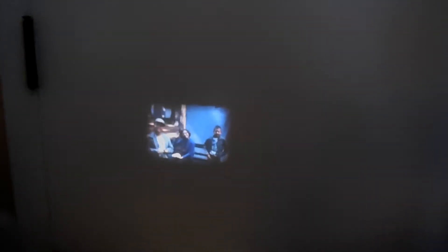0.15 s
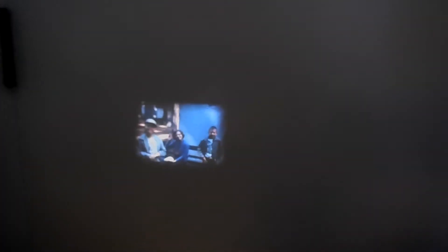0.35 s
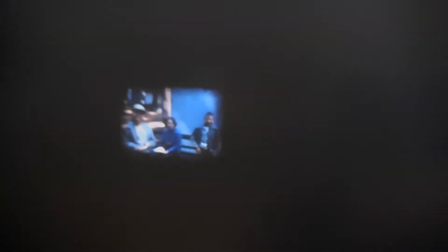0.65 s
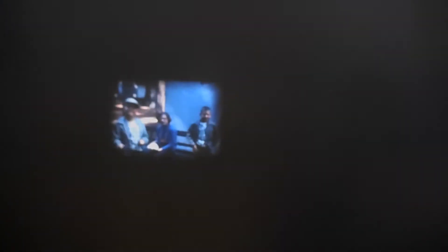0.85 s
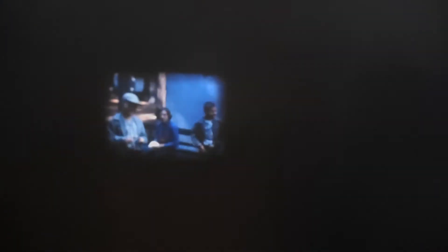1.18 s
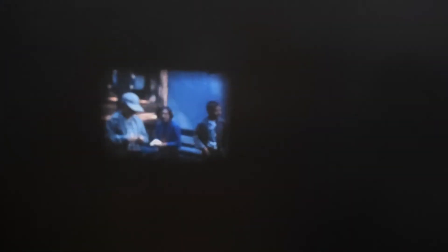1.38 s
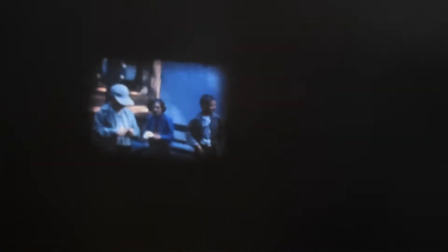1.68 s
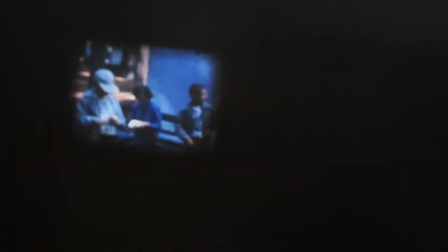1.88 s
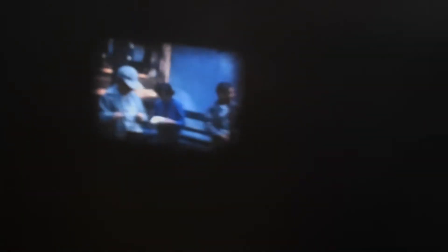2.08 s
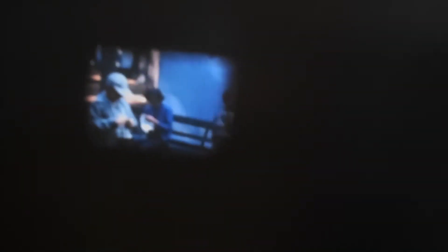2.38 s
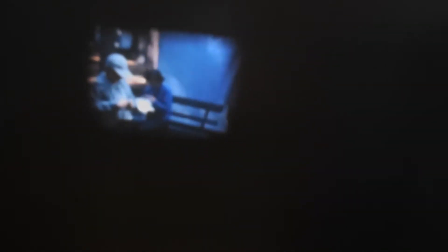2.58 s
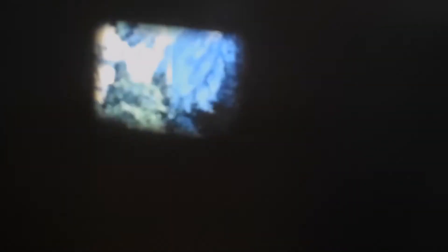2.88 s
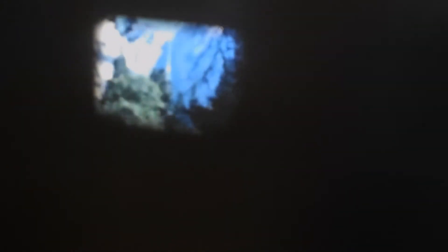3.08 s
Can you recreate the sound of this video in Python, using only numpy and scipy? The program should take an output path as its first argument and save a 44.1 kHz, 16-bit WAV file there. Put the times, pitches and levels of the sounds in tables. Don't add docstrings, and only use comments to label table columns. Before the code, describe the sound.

A small film projector chatters steadily in a room, about thirteen strokes a second, over fan wash and gear whine. Muffled at first, it abruptly becomes crisp and full past two seconds, recorded by a handheld camera.

```python
import sys
import numpy as np
from scipy import signal
from scipy.fft import irfft
from scipy.io import wavfile
from scipy.ndimage import uniform_filter1d

SR = 44100
rng = np.random.default_rng(int(sys.argv[2]) if len(sys.argv) > 2 else 0)


def store_pcm(level_fs):
    pcm = np.round(np.clip(level_fs, -1, 1) * 32767).astype(np.int16)
    wavfile.write(sys.argv[1], SR, np.atleast_2d(pcm).T)


def ratio_of_db(decibels):
    return 10 ** (np.asarray(decibels, float) / 20)


N = 142884

# start_s, housing_blow_db, gate_rattle_db, upper_gear_mesh_db
STROKES = [(0.0, 7.5, 0, 9), (0.0722, -1.5, -0.5, -15), (0.1461, -2.5, 0, 10), (0.2216, -1.5, -1.5, 0),
           (0.2957, -2.5, 0.5, 3), (0.3698, -2.5, -1.5, 0), (0.4443, -1, 0.0, 0), (0.5182, -0.5, 0.5, 1),
           (0.5939, 0.5, -0.5, 2), (0.6678, -1, 1.5, 1.5), (0.7422, -1.5, -0.5, 4), (0.8176, -1, -0.5, 2),
           (0.8913, -1, 1.5, 0.5), (0.9663, -0.5, -1, -1), (1.0406, -0.5, 0, 2), (1.1153, -2.5, -0.5, 7),
           (1.1905, -0.5, 0.5, 1), (1.2645, -0.5, 1, 2), (1.3396, 1, -1, 3.5), (1.4137, 0.5, 1, 5),
           (1.487, -1.5, 0.5, 1), (1.5616, -1, 0.0, -3), (1.6349, 0, -0.5, 0.5), (1.7095, -0.5, -0.0, 3.5),
           (1.7835, -2.5, 0.5, -2), (1.8573, 1.0, 3.5, 2), (1.9329, 1, 1.5, 3), (2.0064, 1.5, 1.5, 2),
           (2.0809, 5, 2.5, 2), (2.1551, 2.5, 1.5, 5), (2.2283, -1, -2.5, 4), (2.3022, -0.5, -1.5, -5),
           (2.3751, -0.5, 1, 6.5), (2.4495, -2.5, -1.5, 2.5), (2.5237, -2.5, -1, 4.5),
           (2.5967, -2, -0.5, 2), (2.6716, -1.5, -1, 6.5), (2.7453, 0.5, 0, -1), (2.8197, 1.0, -0.5, 3),
           (2.8943, -3.5, -2, -1.5), (2.9679, -2, -2, 2.5), (3.0433, 0, -1.5, -0.5), (3.1173, -2, -2, -2.0),
           (3.1914, -3, -1.0, 4.5)]


def read(points, hz):
    f, value = np.transpose(points)
    return np.interp(np.log(hz + 1), np.log(f + 1), value)


def evened(x):
    return x / np.sqrt(np.mean(x ** 2) + 1e-20)


def colour(x, points):
    hz = np.fft.rfftfreq(4096, 1 / SR)
    taps = np.roll(irfft(ratio_of_db(read(points, hz))), 2048) * np.hanning(4096)
    return signal.oaconvolve(x, taps, "same")


def shifted(x, delay_s):
    return np.roll(x, round(delay_s * SR))


def drift(change_s):
    size = round(change_s * SR)
    once = uniform_filter1d(rng.standard_normal(N), size)
    return evened(uniform_filter1d(once, size))


def resonate(x, hz, width_hz):
    turn = np.exp(2j * np.pi * np.cumsum(hz * np.ones(len(x))) / SR)
    radius = np.exp(-np.pi * width_hz / SR)
    return 2 * (turn * signal.lfilter([1 - radius], [1, -radius], x / turn)).real


def strokes(column):
    table, train = np.array(STROKES), np.zeros(N)
    train[(table[:, 0] * SR).astype(int)] = ratio_of_db(table[:, column])
    return train


def burst(train, t60):
    rise_s, hold_s, lead_s, lead_db = .004, .013, .005, -9
    t = np.arange(9000) / SR - lead_s
    decay = ratio_of_db(-60 * np.maximum(t - hold_s, 0) / t60) ** 2
    power = np.where(t < 0, ratio_of_db(lead_db) ** 2, np.minimum(1.0 + t / rise_s, 1) * decay)
    lead = round(lead_s * SR)
    level = np.sqrt(abs(signal.oaconvolve(train ** 2, power)[lead:N + lead]))
    return level, np.sqrt(power), lead


def ticks(size):
    ticks_per_s, spread_db = 7000, 1.6
    hit = rng.random(size) < ticks_per_s / SR
    strength_db = spread_db * np.minimum(rng.exponential(1, size), 4)
    return evened(hit * rng.standard_normal(size) * ratio_of_db(strength_db))


def rumble():
    # centre_hz, width_hz, level_db
    lumps = [(39.8, 16, 3.5), (60, 13, 5), (92, 7.8, 5.5)]
    # time_s, level_db
    swell = [(0, -54), (.4, -45.5), (0.799, -39.5), (1.199, -40), (1.6, -42.5), (2.0, -35), (2.299, -49.5),
             (2.499, -46), (2.6, -44.5), (2.75, -48), (2.9, -68), (3.048, -44.5), (3.24, -44)]
    low = np.zeros(N)
    for hz, width_hz, db in lumps:
        once = resonate(rng.standard_normal(N), hz, width_hz)
        low += ratio_of_db(db) * evened(resonate(once, hz, width_hz))
    return evened(low) * ratio_of_db(np.interp(np.arange(N) / SR, *np.transpose(swell)))


def grip():
    # time_s, pitch_hz, level_db
    creak = [
        (2.199, 99, -65),
        (2.329, 102.2, -44),
        (2.42, 96.8, -54),
        (2.5, 92, -42),
        (2.58, 73.2, -52),
        (2.66, 62.6, -41),
        (2.838, 60, -37.5),
        (2.921, 60, -44),
        (3.24, 74.3, -44),
    ]
    s, hz, db = np.transpose(creak)
    t = np.arange(N) / SR
    turns = np.cumsum(np.interp(t, s, hz) + 3.2 * drift(0.018)) / SR
    return ratio_of_db(np.interp(t, s, db) + 1.3 * drift(0.014)) * np.sin(2 * np.pi * turns)


def wash():
    # frequency_hz, level_db
    fan_colour = [(110, -52), (165, -35), (260, -14.5), (425, -1.5), (890, -10), (1480, -13.5),
                  (7700, -18.5), (10800, -14), (12300, -7), (15800, -10.5)]
    wash_db, patch_db = -29.5, 1.5
    wobble_db, wobble_hz, wobble_phase = 0.8, 5.3, .3
    frames, hz = N // 256 + 5, np.fft.rfftfreq(1024, 1 / SR)
    a, b, c, d, patches = rng.standard_normal((frames, 513, 5)).T
    patches = uniform_filter1d(patches, size=10, axis=0)
    patches = evened(uniform_filter1d(patches, size=10, axis=1))
    t = (np.arange(frames) - 2) * 256 / SR
    wobble = wobble_db * np.cos(2 * np.pi * wobble_hz * t - wobble_phase)
    gain = ratio_of_db(read(fan_colour, hz)[:, None] + patch_db * patches + wobble)
    bins = np.array([a + 1j * b, c + 1j * d]) * gain
    noise = signal.istft(bins, nperseg=1024, noverlap=768)[1][:, :N]
    return ratio_of_db(wash_db) * evened(noise)


def whine(train):
    # pitch_hz, wander_hz, level_db, load_db, load_start_s, load_length_s
    gear_tones = [(1134, 12, -37.5, 2.5, -.004, .012), (1213, 10, -44, 6.5, -.004, .04)]
    # early_mesh_db, late_mesh_db
    lower_mesh = [(1, -4.5), (-6, 0), (-2, 4), (-7, -19), (-1.5, 5), (-10, -8), (5, -11), (2, 3.5),
                  (-1, -2), (1, -4), (-7, 5), (-14, -2), (3.0, 8.5), (-7, -4), (0, -4), (0, 2), (-5, -8),
                  (1, -8), (2.5, -14), (6, -1), (4, 0), (6, -6), (1, 1.5), (2.5, 4.5), (-20, -4),
                  (1.0, 2.5), (1, 1), (-9, 6.5), (-4, -20), (6, 1), (-2, 1.0), (6.5, -2), (1.0, -1.5),
                  (-2, 8.5), (-6, 6.5), (2, 0), (2.0, -6), (-0.0, 2.0), (2.5, 6.5), (-3, 2), (-4, 0),
                  (-1, 1.5), (-1, 3.5), (2.5, -4)]
    sag_hz, sag_at_s, flutter_db, wander_s = 11, -.012, 1.8, .014
    t, out, at = np.arange(N) / SR, np.zeros(N), np.array(STROKES)[:, 0]
    sag = sag_hz * (1 - 2 * signal.oaconvolve(shifted(train, sag_at_s), np.hanning(3274), "same"))
    halves = (at[:, None] + [.009, .045]).ravel()
    lower_db = np.interp(t, halves, np.ravel(lower_mesh))
    upper_db = np.interp(t, at + .017, np.array(STROKES)[:, 3])
    for (hz, wander_hz, db, load_db, start_s, length_s), mesh_db in zip(gear_tones, (lower_db, upper_db)):
        load = signal.oaconvolve(shifted(train, start_s), np.ones(round(length_s * SR)))[:N]
        load = uniform_filter1d(load, size=250)
        level_db = db + load_db * load + flutter_db * drift(wander_s) + mesh_db
        pitch_hz = hz + sag + wander_hz * drift(wander_s)
        out += ratio_of_db(level_db) * np.sin(2 * np.pi * np.cumsum(pitch_hz) / SR)
    return out


def flap(train):
    late_s, t60, flap_hz, flap_db = 0.0021, 0.27, 7800, -45.5
    level = burst(shifted(train, late_s), t60)[0]
    highpass = signal.butter(4, flap_hz, "high", fs=SR, output="sos")
    return ratio_of_db(flap_db) * evened(signal.sosfilt(highpass, level * ticks(size=N)))


def cam(train):
    # delay_s, level_db
    cycle = [
        (.0018, -4.5),
        (.0075, 1.5),
        (.0145, -12.5),
        (0.0216, -14),
        (.028, -6.5),
        (0.031, -17),
        (0.047, -4.5),
        (0.06, -4),
        (0.07, -10),
    ]
    tick_db, tick_hz, t60, spread_db = -28, 4300, .009, 2.5
    t = np.arange(800) / SR
    tick = ratio_of_db(-60 * t / t60) * np.sin(2 * np.pi * tick_hz * t) + .3 * (t == 0)
    hits = np.zeros(N)
    for delay_s, db in cycle:
        strength = ratio_of_db(db + spread_db * rng.standard_normal(N))
        hits += strength * shifted(train, delay_s) * rng.choice([-1., 1.], N)
    return ratio_of_db(tick_db) * signal.oaconvolve(hits, tick)[:N]


def rattle(train):
    # frequency_hz, level_db
    gate_colour = [(900, -10.5), (1500, -7.5), (2100, -1.5), (3050, -10), (4250, -5.5), (6800, -13.5),
                   (13300, -1.5), (15800, -7.5)]
    same_db, same_hz, fresh_db, t60 = -47.5, 3760, -31, 0.12
    level, shape, lead = burst(train, t60)
    same = signal.oaconvolve(train, ticks(size=len(shape)) * shape)[lead:N + lead]
    same = signal.lfilter(*signal.butter(2, same_hz, fs=SR), colour(same, gate_colour))
    fresh = colour(level * ticks(size=N), gate_colour)
    return ratio_of_db(same_db) * evened(same) + ratio_of_db(fresh_db) * evened(fresh)


def housing(train):
    mode_hz = [338, 385, 422, 468, 498, 555, 628, 704, 766, 960, 1020, 1670, 1860, 2090]
    # level_db, t60_s
    mode_ring = [(-51.5, .25), (-47, .1), (-39, .22), (-41, .17), (-40, .05), (-42, .12), (-38.5, .06),
                 (-38, .11), (-40.5, .09), (-48.5, .05), (-46, .09), (-39.5, .1), (-44, .05), (-36, .06)]
    rebound_share = [.5, .2, -.1, .7, -.4, -.5, -.7, -.45, -.4, 0, 0, .1, .1, .3]
    early_s, rebound_s, push_s, uneven, housing_db = .0015, .0135, .0045, .2, 8
    t, out = np.arange(14000) / SR, np.zeros(N)
    blow = shifted(train, -early_s)
    back = shifted(train, rebound_s - early_s)
    for k, (hz, share, (db, t60)) in enumerate(zip(mode_hz, rebound_share, mode_ring)):
        decay = ratio_of_db(db + housing_db - 60 * t / t60)
        push = 1 - np.exp(-t / push_s)
        ring = (-1) ** k * decay * np.sin(2 * np.pi * hz * t) * push
        blows = (blow + share * back) * (1 + uneven * rng.standard_normal(N))
        out += signal.oaconvolve(blows, ring)[:N]
    return out


def room(x):
    # frequency_hz, t60_s
    decay_time = [(200, 0.53), (1000, 0.061), (4000, 0.095), (12000, 0.12)]
    taps = np.zeros((2, 20000))
    at = np.arange(100, 19980, 20) + rng.integers(0, 20, (2, 994))
    np.put_along_axis(taps, at, rng.choice([-1., 1.], at.shape), 1)
    hz, t, bins = signal.stft(taps, SR, nperseg=256)
    decay = ratio_of_db(-60 * t / read(decay_time, hz)[:, None])
    tail = signal.istft(bins * decay, SR, nperseg=256)[1]
    return signal.fftconvolve(x[None], tail / np.linalg.norm(tail[0]), axes=1)[:, :N]


def scene():
    # frequency_hz, level_db
    side_colour = [(60, -37), (160, -29), (330, -33), (640, -5), (1410, -7), (3100, 2.5), (6820, 0),
                   (15000, -2.5)]
    # frequency_hz, level_db
    lean = [(60, 0), (240, -.2), (600, -.8), (2000, -1.3), (4000, 1), (8000, -.1), (13000, 1.3)]
    gate_late_s, housing_wet, room_db = .002, .25, -6.5
    train, gate_train = strokes(column=1), strokes(column=2)
    loose = shifted(gate_train, gate_late_s)
    body = housing(train)
    gate = rattle(loose) + flap(loose) + cam(gate_train)
    machine = body + gate
    wet = room(housing_wet * body + gate)
    air = wash()
    gears = whine(1. * (train > 0))
    mid = machine + ratio_of_db(room_db) * wet[0] + air[0] + gears + rumble() + grip()
    side = 0.29 * np.roll(machine, 7) + 1.0 * wet[1] + air[1]
    side += 0.13 * np.roll(air[0], 7) + 0.59 * np.roll(gears, 9)
    side = colour(side, side_colour)
    left = colour(mid + side, [(f, db / 2) for f, db in lean])
    right = colour(mid - side, [(f, -db / 2) for f, db in lean])
    return np.array([left, right])


def roll_off(x):
    return signal.sosfilt(signal.butter(12, 16200, fs=SR, output="sos"), x)


def record(dry):
    # frequency_hz, gain_db
    noise_filter = [(30, -27.5), (90, -20.5), (200, -9.5), (400, -4), (1200, 0.8), (4000, -6.5),
                    (8000, -11.5), (13500, -18.5)]
    off_s, fade_s, top_hz, edge_hz = 2.234, .006, 14600, 15780
    hz = np.fft.rfftfreq(8192, 1 / SR)
    gain = ratio_of_db(read(noise_filter, hz)) / (1 + (hz / top_hz) ** 60)
    taps = np.roll(irfft(gain), 4096) * np.hanning(8192)
    dull = signal.oaconvolve(dry, taps[None], "same", axes=1)
    off = np.clip((np.arange(N) / SR - off_s) / fade_s + .5, 0, 1)
    band_limit = signal.firwin(511, edge_hz, window=("kaiser", 9), fs=SR)
    mix = signal.oaconvolve(dull + off * (dry - dull), band_limit[None], "same", axes=1)
    return roll_off(mix)


dry = scene()
out = record(dry)
store_pcm(out)
```